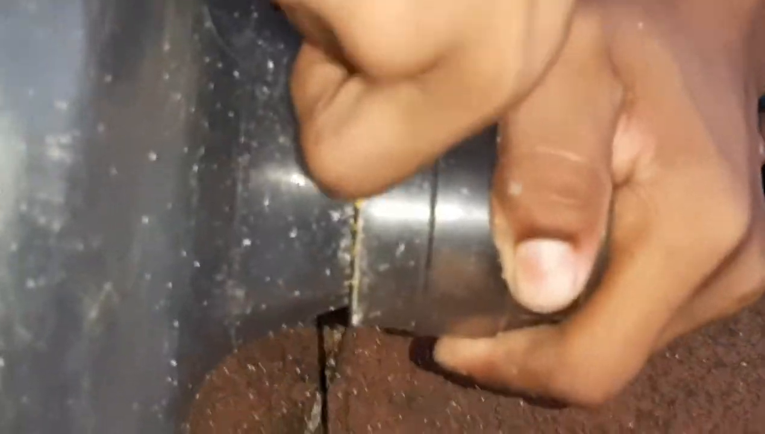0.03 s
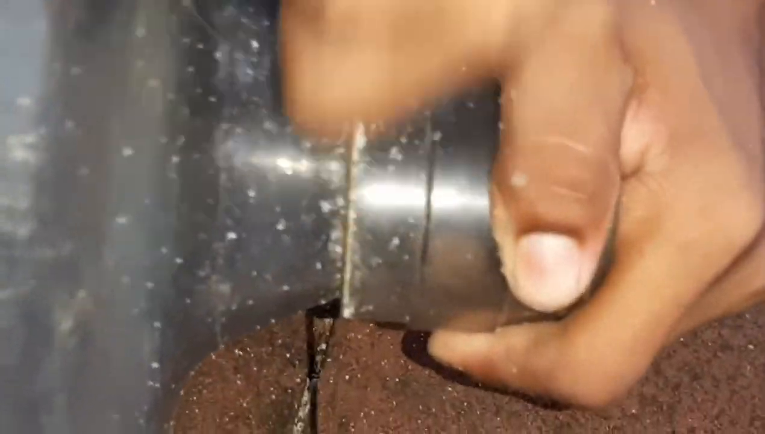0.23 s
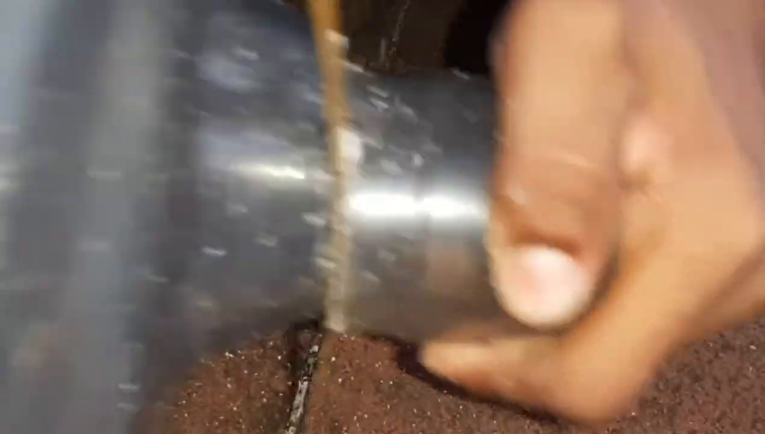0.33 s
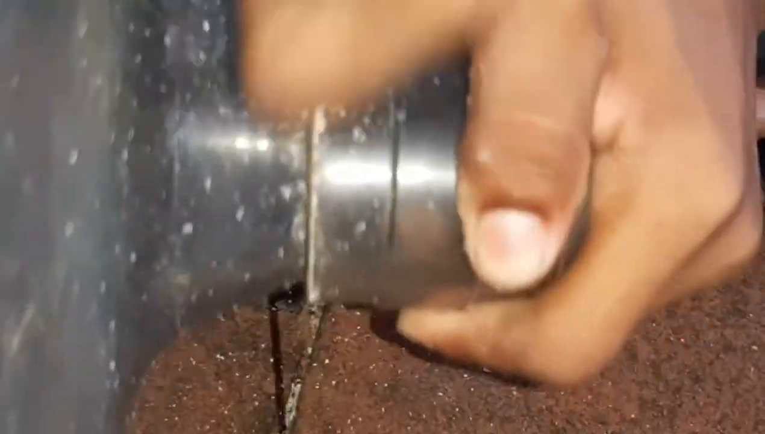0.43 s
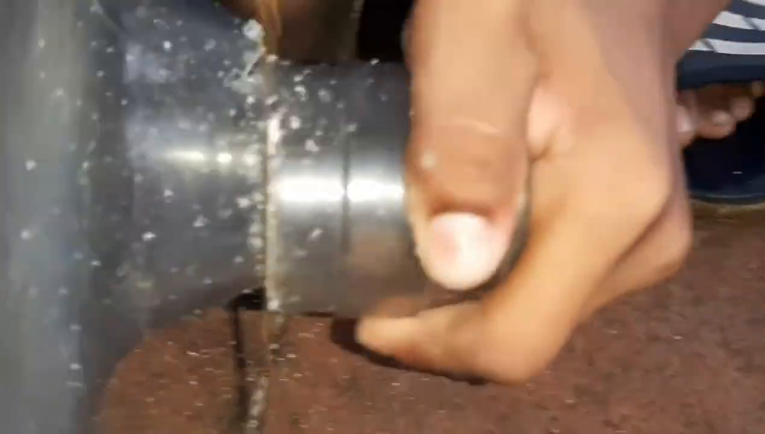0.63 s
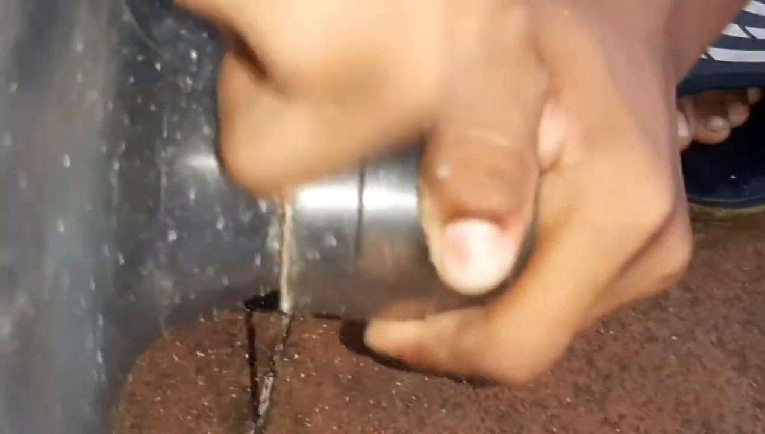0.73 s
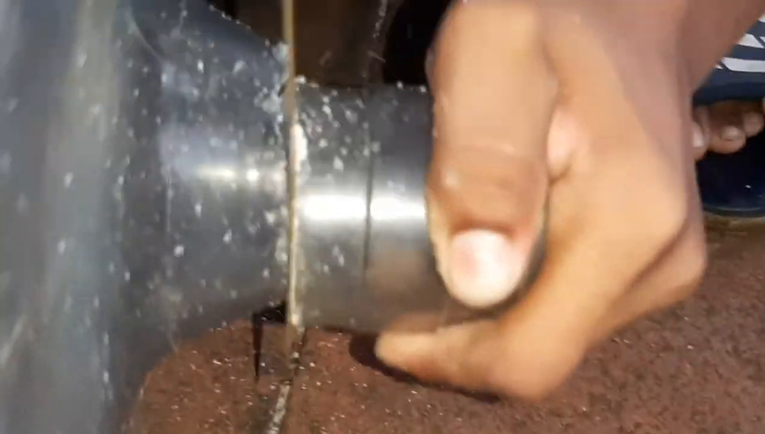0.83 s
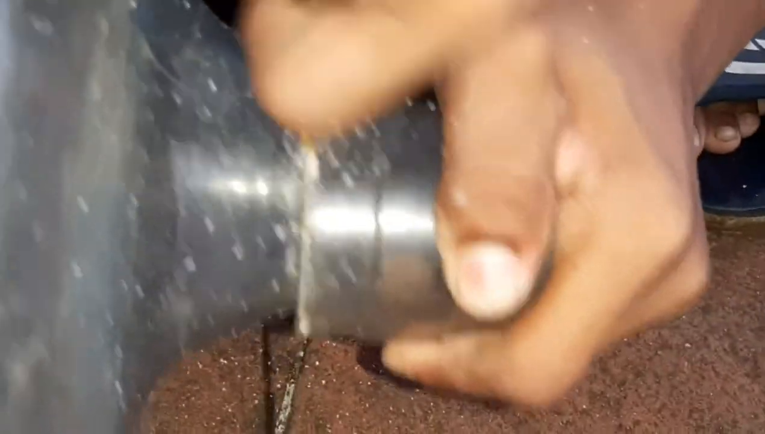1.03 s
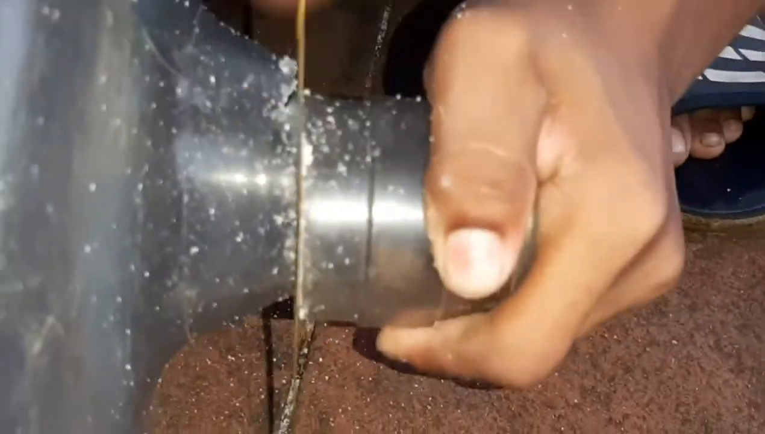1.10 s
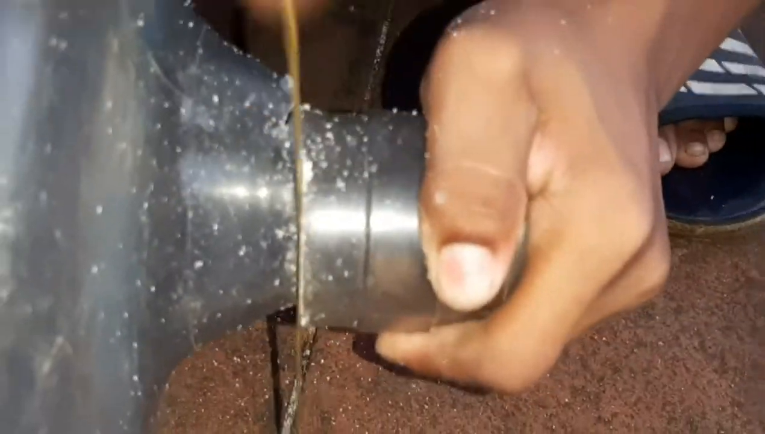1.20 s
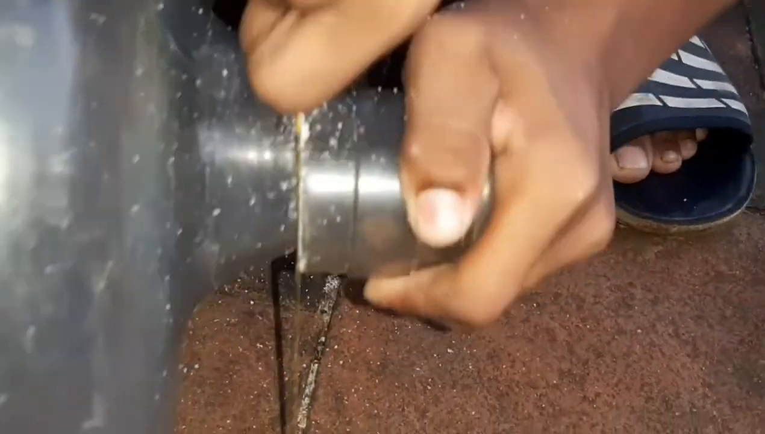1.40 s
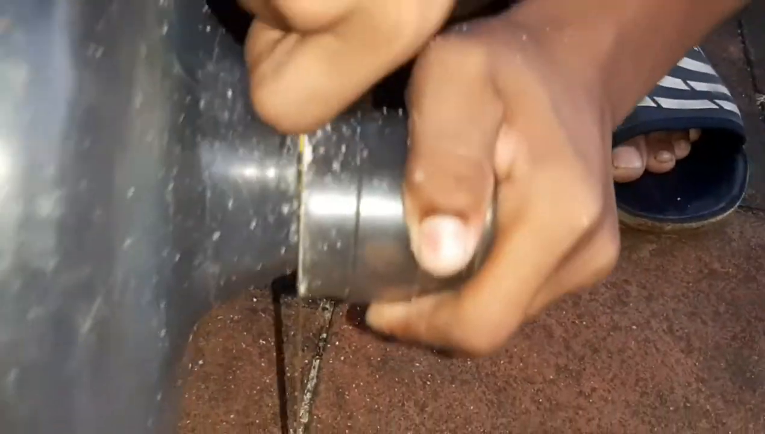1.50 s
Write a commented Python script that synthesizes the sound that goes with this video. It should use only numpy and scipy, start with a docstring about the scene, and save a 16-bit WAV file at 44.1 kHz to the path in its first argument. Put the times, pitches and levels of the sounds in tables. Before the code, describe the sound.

A hand saw blade rasps through a plastic fitting on a hollow drum, close by outdoors, about seven strokes a second. It starts lightly and bites in at 0.2 seconds, gritty and slightly ringing, with small chip cracks and short hollow knocks where it snags. The sawing is loudest from about 0.6 to 1.1 seconds, then weakens, ending in a light drag around 1.5 seconds.

```python
"""Outdoors in a yard, close by, a hand blade saws through a plastic fitting on a hollow drum,
about seven strokes a second. Its teeth catch at a rate that follows the hand's speed and make
the fitting ring, while tearing chips add a gritty rasp. Now and then a larger chip cracks off,
or the blade snags and knocks the drum. It ends on a light drag."""
import sys
import numpy as np
from scipy import signal
from scipy.fft import rfft, irfft
from scipy.io import wavfile
from scipy.ndimage import uniform_filter1d, map_coordinates

SR = 44100
rng = np.random.default_rng(int(sys.argv[2]) if len(sys.argv) > 2 else 0)


def log_audio(samples):
    """Write samples as a 16-bit WAV file to the path given in sys.argv[1]."""
    # one column per channel
    frames = np.atleast_2d(samples).T
    # limit to full scale, then quantise
    limited = np.clip(frames, -1, 1)
    pcm = np.round(limited * 32767).astype(np.int16)
    wavfile.write(sys.argv[1], SR, pcm)


N = 68355

# Tone colours of the noises. Each row: frequency in Hz, relative level in dB.
AIR_COLOUR = [(25, -17), (60, -13), (130, -1), (360, -1.5), (700, -14), (2000, -23), (5000, -31),
              (16000, -41)]
CLACK_COLOUR = [(25, -42), (50, -26.5), (90, -8.5), (150, 3), (350, 1), (900, -6.5), (2500, -20),
                (8000, -36), (16000, -68)]
SCRAPE_COLOUR = [(30, -46.5), (80, -16), (150, -2), (350, 4), (900, -6), (2500, -15), (8000, -28.5),
                 (16000, -86)]
RASP_COLOUR = [(100, -37.5), (500, -6.5), (850, 5.5), (1250, -1), (1620, 3.5), (1850, -3.5), (2350, -4.5),
               (2800, -5.5), (3200, -8), (3600, -18), (4200, -13.5), (6000, -20), (16000, -63)]
HISS_COLOUR = [(500, -14), (2500, -10), (3700, -6), (4300, 1.5), (5300, 1), (6500, -0.5), (8200, -6),
               (11000, -8.5), (15500, -11)]
# The blade snags. Each row: start in seconds, level in dB, pitch in Hz, seconds to fade by 60 dB,
# build-up in seconds, clack level against the ring in dB.
BLADE_SNAGS = [(.036, -23.5, 711, 0.042, 0.0018, -10.5), (.037, -32, 359, .05, .002, -15),
               (0.086, -32, 178, .1, 0.0034, -11), (.094, -25, 363, 0.043, 0.0023, -14),
               (.176, -32.5, 188, 0.14, 0.0061, -9), (.198, -16, 376, 0.064, 0.0022, -12),
               (.211, -7.5, 367, 0.13, 0.0046, -12), (.300, -13.5, 372.5, 0.08, 0.0025, -15),
               (.305, -17, 748, 0.055, 0.0016, -14), (.345, -14, 316, 0.1, 0.003, -12),
               (.355, -10, 179, 0.043, 0.0018, -8), (.357, -14.5, 262, 0.072, 0.0047, -30),
               (.368, -12, 337, .06, 0.0029, -23), (.511, -12.5, 369, 0.033, 0.0019, -30),
               (.62, -25, 378, .07, .003, -9), (.652, -10.5, 368.5, 0.15, 0.0068, -19),
               (.727, -6.5, 173, 0.06, 0.0057, -16), (.729, -5, 714, 0.032, 0.00091, -16),
               (.779, -10, 326.7, 0.05, 0.0016, -30), (.796, -8, 342, 0.038, 0.00068, -19),
               (.825, -6, 905, 0.056, 0.0032, -24), (.859, 1.5, 735, 0.068, 0.0051, -36),
               (.874, -14, 387, 0.059, 0.0014, -12), (.918, -22.5, 614.6, .1, 0.0055, -12),
               (.955, -8.5, 622.5, 0.087, 0.0029, -12), (1.008, -15.5, 1020, 0.057, 0.0016, -29),
               (1.091, -0.5, 356.7, 0.037, 0.0024, -18), (1.214, -19.5, 335, 0.058, 0.00099, -13),
               (1.29, -17.5, 342, 0.23, 0.015, -5.5), (1.356, -16, 161, 0.043, 0.0025, -8.5),
               (1.377, -13.5, 283, 0.062, 0.0017, -12), (1.42, -25, 355.9, 0.051, 0.0025, -2)]
# Larger chips. Each row: start in seconds, rasp level in dB, hiss level in dB, decay in seconds.
CHIP_CRACKS = [(0.056, -38.5, -41, 0.004), (.179, -45, -49, 0.026), (.271, -16, -23, 0.019),
               (.345, -17, -29.5, 0.011), (.388, -21, -22.5, 0.0082), (0.422, -22.5, -33, 0.015),
               (.511, -35, -27, .003), (.542, -23, -23, .006), (0.692, -16, -23, 0.006),
               (0.815, -30, -16, .006), (0.834, -33, -15, 0.0037), (0.936, -17, -39.5, .011),
               (1.073, -38, -46, 0.0063), (1.215, -33, -34, 0.0035), (1.269, -20, -38, 0.0064),
               (1.353, -27, -51, 0.0061), (1.384, -37, -30, 0.0048), (1.431, -38.5, -46.5, 0.011)]
# Saw strokes. Each row: start, rise and hold in seconds, tooth, rasp and hiss levels in dB,
# top rate in teeth a second, mid-stroke swell of the chips in dB, singing pitch in Hz, its boost in dB.
SAW_STROKES = [ (.068, 0.0069, 0.031, -44.5, -44.5, -50, 498, 16, 1600, 1),
               (0.191, 0.019, 0.09, -21, -20.5, -29.5, 1101, 3.5, 1710, 2.5),
               (.338, 0.0027, 0.099, -21, -23, -31, 1456, 29.5, 1500, 3.5),
               (.509, 0.0052, 0.073, -20.5, -26.5, -32.5, 901.3, 2.5, 920, 5),
               (0.637, 0.013, 0.072, -22.5, -17, -27.5, 1607, 24, 1420, 2),
               (0.773, 0.0073, 0.089, -21.5, -17, -22.5, 1548, 14, 799.2, 3.5),
               (0.922, 0.0099, 0.079, -25.5, -24.5, -31, 702, 8.5, 710, 9),
               (1.068, 0.03, .082, -24.5, -29, -34.5, 1095, 2.5, 2170, 1.5),
               (1.208, 0.012, 0.079, -24.5, -26.5, -32.5, 1507, 8.5, 1451, 2),
               (1.348, 0.0063, 0.044, -28, -31.5, -38, 599.5, 8.5, 2430, 4),
               (1.47, 0.061, 0.076, -36.5, -37.5, -51.5, 1177, -7.5, 2450, 8)]
# Tones the parts ring at. Each row: pitch in Hz, width in Hz, relative level in dB.
BODY_TONES = [(167, 27, -8), (278, 23, -10), (370.4, 25.3, 4), (469, 52, -2.5), (656.5, 68, -2.5),
              (735, 63, -2), (905, 11, -33), (1020, 127, -8.5), (1130, 70, -13)]
BLADE_TONES = [(901, 31, -1), (987, 28, 0.5), (1202.5, 33, 4.5), (1455, 15, -6), (1623, 35, -10.5),
               (1797, 52, 3.5), (2108, 80, 1.5), (2738, 56, 3), (2860, 13, -24), (5000, 48, 2),
               (5550, 74, -3), (5470, 48, -5), (6080, 72, 3.5)]
# Finer tones that shift as the blade slides. Each row: frequency in Hz, typical rise or dip in dB.
RIPPLE_DEPTHS = [(500, 1.5), (1500, 2), (4500, 3), (12000, 3.5)]
# How far the left ear's wave is ahead of the right's. Each row: frequency in Hz, lead in radians.
LEFT_EAR_LEAD = [(150, 0.035), (380, 0.9), (750, 1.23), (1300, 2.27), (2000, 1.18), (3500, 1.58),
                 (5500, 1.8), (15000, 1.5)]
# The yard's echo. Each row: frequency in Hz, seconds to fade by 60 dB.
ECHO_TIMES = [(200, 0.12), (2000, 0.26), (10000, 0.37)]


def amp(db):
    """Turn decibels into a gain."""
    return 10 ** (np.asarray(db) / 20)


def unit(x):
    """Scale to an average power of 1."""
    return x / np.sqrt(np.mean(x ** 2) + 1e-20)


def along(points, hz):
    """Read between a table's rows on a log frequency scale."""
    freqs, values = np.transpose(points)
    return np.interp(np.log(hz + 1), np.log(freqs + 1), values)


def wobble(per_second):
    """A smooth curve through this many random points a second."""
    return map_coordinates(rng.standard_normal(N), [np.arange(N) * per_second / SR])


def filtered(x, response):
    """Change each frequency's strength and phase by response(hz)."""
    return irfft(rfft(x, 2 * N) * response(np.fft.rfftfreq(2 * N, 1 / SR)), 2 * N)[..., :N]


def coloured(x, colour):
    """Give a sound a tone colour; white noise keeps its power."""
    def response(hz):
        cepstrum = irfft(np.log(unit(amp(along(colour, hz)))))
        cepstrum[1:N] *= 2  # folded so that ringing comes after a hit, never before
        cepstrum[N + 1:] = 0
        return np.exp(rfft(cepstrum))
    return filtered(x, response)


def resonances(hz, tones):
    """One response for each tone, strongest at its pitch."""
    return [amp(db) * 1j * hz * width / (pitch ** 2 - hz ** 2 + 1j * hz * width)
            for pitch, width, db in tones]


def outdoor_air():
    """A low rush of air, mostly the same in both ears."""
    return coloured(rng.standard_normal(N) + .5 * rng.standard_normal((2, N)), AIR_COLOUR)


def snags():
    """The blade sticks and lets go: a clack and a short ring of the plastic."""
    clack_decay_s = 0.0068
    ring, clack = np.zeros((2, N))
    for start, db, hz, fade_s, build_s, clack_db in BLADE_SNAGS:
        t = np.maximum(np.arange(N) / SR - start, 0)
        level = amp(db - 60 * t / fade_s) * (1 - np.exp(-t / build_s))
        ring += level * np.sin(2 * np.pi * hz * t)
        clack += amp(db + clack_db) * (t > 0) * np.exp(-t / clack_decay_s)
    return ring + coloured(clack * rng.standard_normal(N), CLACK_COLOUR)


def cracks():
    """Larger chips break away, each giving a burst in the gains of rasp and hiss."""
    break_s = 0.00087
    rasp, hiss = np.zeros((2, N))
    for start, rasp_db, hiss_db, decay_s in CHIP_CRACKS:
        t = np.maximum(np.arange(N) / SR - start, 0)
        burst = (1 - np.exp(-t / break_s)) * np.exp(-t / decay_s)
        rasp += amp(rasp_db) * burst
        hiss += amp(hiss_db) * burst
    return rasp, hiss


def crackle(bites):
    """Tiny breaks in the plastic, partly at the teeth's bites and partly between them."""
    chips_per_s, scatter_db, tooth_share = 6000, 5, 0.38
    sizes = rng.choice([-1, 1], N) * amp(scatter_db * np.clip(rng.standard_normal(N), -2, 2))
    grains = unit(sizes * (rng.random(N) < chips_per_s / SR))
    return unit(tooth_share * bites + (1 - tooth_share) * grains)


def blade_ring(x):
    """Blade and fitting ring at steady tones; finer ones change each stroke as the blade shifts."""
    sing_width_octaves = 0.14
    x = filtered(x, lambda hz: 1 + sum(resonances(hz, BLADE_TONES)))
    starts = [stroke[0] for stroke in SAW_STROKES]
    stroke_now = np.maximum(np.searchsorted(starts, np.arange(N) / SR) - 1, 0)
    hz = np.arange(0, SR / 2, 90)
    out = np.zeros_like(x)
    for k, (*_, sing_hz, sing_db) in enumerate(SAW_STROKES):
        octaves_away = np.log2((hz + 1) / sing_hz)
        sing = sing_db * np.exp(-(octaves_away / sing_width_octaves) ** 2 / 2)
        ripple = along(RIPPLE_DEPTHS, hz) * np.clip(rng.standard_normal(len(hz)), -2, 2)
        out += coloured(x * (stroke_now == k), np.column_stack([hz, sing + ripple]))
    return out


def hand():
    """Each stroke speeds up and slows down. Gives the tooth rate and gains of teeth, rasp and hiss."""
    chip_fade_db_per_s, tooth_fade_db_per_s, run_out_s = 535, 411, .035  # the hand eases off
    rate, teeth, rasp, hiss = np.zeros((4, N))
    for start, rise, hold, tooth_db, rasp_db, hiss_db, top_rate, swell_db, *_ in SAW_STROKES:
        t = np.arange(N) / SR - start
        length = hold + run_out_s
        speed = np.sin(np.pi * np.clip(t / length, 0, 1))
        pressure = np.clip(t / rise, 0, 1)
        since_hold = np.maximum(t - hold, 0)
        swell = np.sin(np.pi * (np.clip(t, 0, hold) / length) ** 1.17)
        cutting = pressure * amp(swell_db * (swell - 1) - chip_fade_db_per_s * since_hold)
        rate = np.maximum(rate, top_rate * speed)
        teeth += pressure * amp(tooth_db - tooth_fade_db_per_s * since_hold)
        rasp += cutting * amp(rasp_db)
        hiss += cutting * amp(hiss_db)
    return np.maximum(rate, 300), teeth, rasp, hiss


def tooth_bites(rate):
    """Each passing tooth makes one uneven click; faster clicks are smaller, so power stays even."""
    jitter_gaps, scatter_db = .11, 6.5
    passed = np.cumsum(rate) / SR
    timing, strength = rng.standard_normal((4000, 2))[:int(passed[-1])].T
    places = np.arange(len(timing)) + jitter_gaps * timing
    at = np.interp(places, passed, np.arange(N)).astype(int)
    sizes = amp(scatter_db * np.clip(strength, -2, 2)) / np.sqrt(rate[at])
    bites = np.bincount(at, sizes, N)
    return unit(bites - uniform_filter1d(bites, size=400))  # take out the steady push


def body_ring(x):
    """The fitting and the hollow drum ring at their own tones."""
    def response(hz):
        total = sum((-1) ** k * tone for k, tone in enumerate(resonances(hz, BODY_TONES)))
        return total / np.sqrt(np.mean(abs(total) ** 2))
    return filtered(x, response)


def sawing():
    """Teeth ring the body; chips rasp and hiss. Gives what both ears share and how they differ."""
    judder_db, clump_db, scrape_db, chips_db = 1, 1.5, -3.5, -2
    body_spread_db, chip_spread_db = -13.5, -5.5
    rate, teeth, rasp_gain, hiss_gain = hand()
    rasp_gain, hiss_gain = np.hypot([rasp_gain, hiss_gain], cracks())
    judder = unit(amp(judder_db * wobble(per_second=130)))  # the blade presses unsteadily
    clumps = unit(np.sqrt(judder) * amp(clump_db * wobble(per_second=170)))  # fine chips bunch up
    rings, chips = [], []
    for part in range(2):  # the sawing both ears share, then a fainter version that widens it
        bites = tooth_bites(rate)
        scrape = coloured(teeth * crackle(bites=0), SCRAPE_COLOUR)
        rings.append(body_ring(teeth * judder * bites) + amp(scrape_db) * scrape)
        rasp = coloured(rasp_gain * judder * crackle(bites), RASP_COLOUR)
        hiss = coloured(hiss_gain * clumps * crackle(tooth_bites(rate)), HISS_COLOUR)
        chips.append(rasp + hiss)
    chips = amp(chips_db) * blade_ring(np.array(chips))
    return rings[0] + chips[0], amp(body_spread_db) * rings[1] + amp(chip_spread_db) * chips[1]


def yard_echo(x):
    """The yard scatters the sound back as a short, smooth tail for each ear."""
    hz, t, noise = signal.stft(rng.standard_normal((2, SR // 2)), SR, nperseg=256)
    fade = amp(-60 * t / along(ECHO_TIMES, hz)[:, None])
    _, tail = signal.istft(noise * fade, SR, nperseg=256)
    tail /= np.linalg.norm(tail, axis=1, keepdims=True)
    return signal.fftconvolve(x[None], tail, axes=1)[:, :N]


def scene():
    """The cut is close and slightly left; the yard answers faintly over quiet air."""
    left_louder_db, echo_db, air_db = 0.73, -17, -49.5
    side = np.array([[1], [-1]])  # left ear, right ear
    shared, spread = sawing()
    cut = shared + snags()
    direct = filtered(cut + side * spread, lambda hz: np.exp(.5j * along(LEFT_EAR_LEAD, hz) * side))
    air = amp(air_db) * outdoor_air()
    echo = amp(echo_db) * yard_echo(cut)
    return amp(left_louder_db * side / 2) * (direct + echo) + air


def record(dry):
    """Cut off the very highest treble."""
    top_hz = 15750
    return filtered(dry, lambda hz: hz < top_hz)


dry = scene()
out = record(dry)
log_audio(out)
```